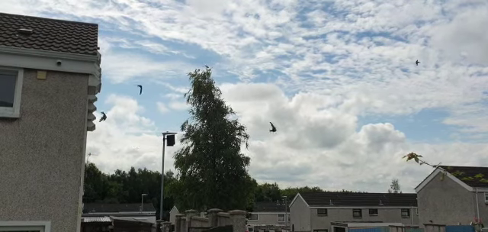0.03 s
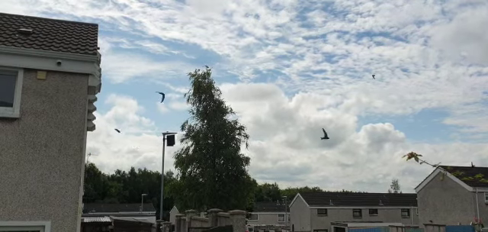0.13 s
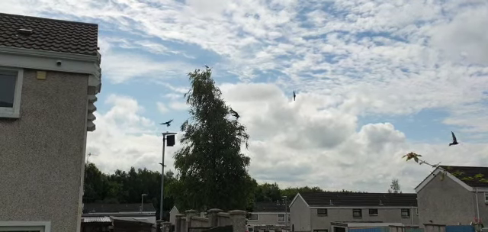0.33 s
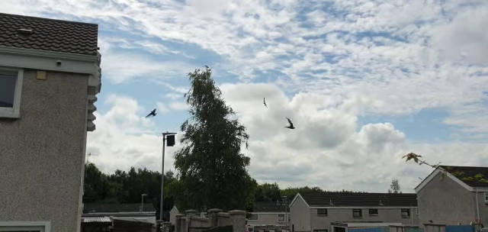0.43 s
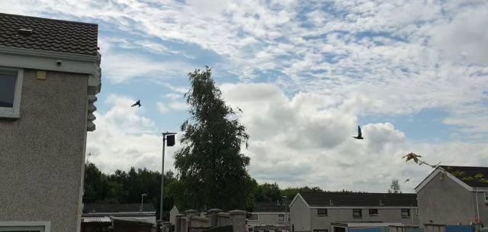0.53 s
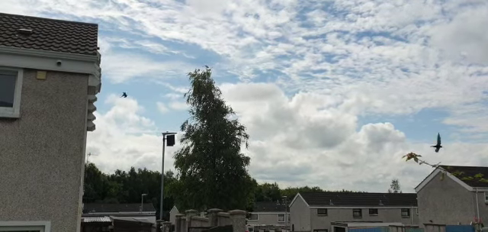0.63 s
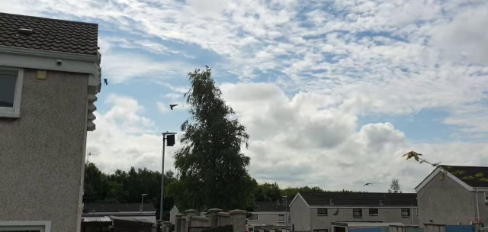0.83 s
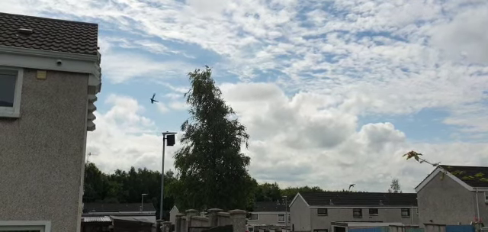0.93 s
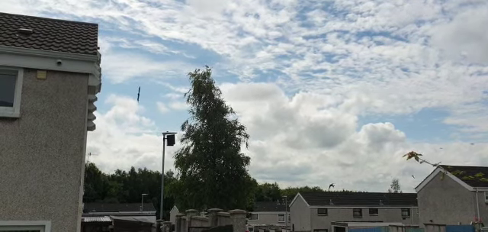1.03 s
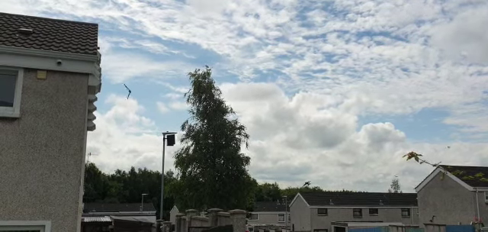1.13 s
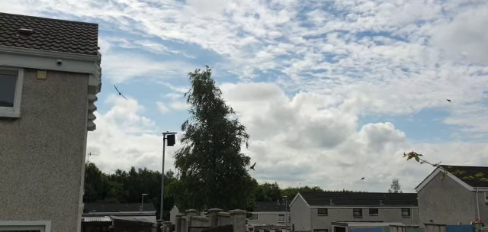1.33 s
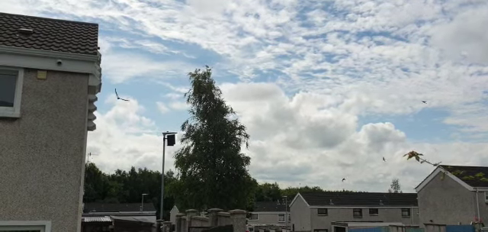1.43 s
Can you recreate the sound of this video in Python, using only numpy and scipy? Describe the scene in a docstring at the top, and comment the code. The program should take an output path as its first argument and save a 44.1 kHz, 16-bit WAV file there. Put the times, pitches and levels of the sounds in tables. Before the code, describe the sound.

Outdoor stereo pickup of fast-flying swifts: a piercing, raspy scream swells on the right, stutters into quick short notes and drops away, followed by thinner, higher, farther screams echoing off walls, with barely audible town rumble, hum and hiss.

```python
"""Screaming swifts between houses

Swifts scream on the right: each voice is a high whistle, modulated in level and pitch by a fast buzz,
and one scream ends in a falling trill of short notes. Distant voices are heard as well.
Walls add reflections whose phases slide, and a tail of random echoes that dies away, treble first.
Shaped noise makes a faint town rumble and hiss; a narrow-band wavering tone makes a hum on the left."""
import sys
import numpy as np
from scipy import signal
from scipy.fft import rfft, irfft
from scipy.io import wavfile
from scipy.ndimage import uniform_filter1d

SR = 44100
rng = np.random.default_rng(int(sys.argv[2]) if len(sys.argv) > 2 else 0)


def to_linear_factor(level_db):
    """Convert decibel levels (scalar or array-like) to linear amplitude factors."""
    exponent = np.asarray(level_db, float) / 20
    return 10 ** exponent


def bounce(signal):
    """Save signal as a 16-bit WAV file at the path given by the first command-line argument."""
    frames = np.transpose(np.atleast_2d(signal))
    limited = np.clip(frames, -1, 1)
    pcm = np.round(limited * 32767).astype(np.int16)
    wavfile.write(sys.argv[1], SR, pcm)


N = 66150  # samples

# Notes of the near trill: t/s, source level/dB, f/Hz
TRILL = [(.4765, -30, 5620), (.499, -32, 5630), (.5225, -28, 5660), (.5465, -32, 5630), (.5715, -35, 5500),
         (.5955, -35, 5350), (.6215, -45, 4850), (.648, -59, 4350)]
BUZZ_HZ = 235  # mean rate of the buzz in the voice
RASP_HZ = 504  # bandwidth of the rough noise modulation of the voice
SLIDE_HZ = 48.6  # how fast the sound paths slide in phase as a bird moves


def read(points, hz):
    """Linear interpolation of a spectral curve on a logarithmic frequency axis."""
    f, value = np.transpose(points)
    return np.interp(np.log(hz + 1), np.log(f + 1), value)


def wander(hz, channels=1):
    """Low-pass filtered complex Gaussian noise of unit power, up to about hz."""
    noise = rng.standard_normal((channels, N)) + 1j * rng.standard_normal((channels, N))
    low_pass = 1 / (1 + (np.fft.fftfreq(N, 1 / SR) / hz) ** 4)
    slow = np.fft.ifft(noise * low_pass)
    return slow / np.sqrt(np.mean(abs(slow) ** 2))


def town():
    """Spectrally shaped, partly coherent stereo noise, with a hum as a randomly modulated tone."""
    # Noise spectrum, relative: f/Hz, spectral density/dB
    spectrum = [(28, -41.5), (48, -0.5), (70, -8), (160, -19.5), (900, -26), (2000, -28.5), (3300, -36.5),
                (8000, -41.5), (12000, -37.5), (15500, -37)]
    # Level of left over right: f/Hz, level difference/dB
    side_balance = [(60, 19.5), (200, 8), (500, -2.5), (6500, -4.5), (8700, 12.5), (11000, -0.5)]
    # Coherence of the two sides: f/Hz, correlation/1
    coherence = [(60, 0.92), (290, 0.03), (1000, 0.033)]
    town_db = -71  # rms of the mean of both sides
    hum_hz, hum_width_hz, hum_db = 67.5, 23, -69
    frames, hz = N // 512 + 5, np.fft.rfftfreq(2048, 1 / SR)
    a, b, c, d, patches = rng.standard_normal((frames, 1025, 5)).T
    patches = uniform_filter1d(patches, size=20, axis=0)  # smooth over frequency
    patches = uniform_filter1d(patches, size=8, axis=1)  # smooth over time
    same = np.clip(read(coherence, hz), -1, 1)[:, None]
    side = to_linear_factor(read(side_balance, hz))[:, None]
    left = a + 1j * b
    right = same * left + np.sqrt(1 - same ** 2) * (c + 1j * d)
    z = np.array([side * left, right]) / np.sqrt(1 + side ** 2)
    z *= to_linear_factor(read(spectrum, hz)[:, None] + 1.7 * patches / patches.std())  # drift of 1.7 dB rms
    noise = signal.istft(z, nperseg=2048, noverlap=1536)[1][:, :N]
    carrier = np.exp(2j * np.pi * hum_hz * np.arange(N) / SR)
    hum = ((1 + 1.3 * wander(hum_width_hz)[0]) * carrier).real
    hum_sides = to_linear_factor(np.array([[0.1], [-18]]))  # left, right in dB
    return to_linear_factor(town_db) * noise / noise.mean(0).std() + to_linear_factor(hum_db) * hum * hum_sides


def whistle(hz, shape, octave):
    """Phase integration of a pitch: a tone and its second harmonic, each under its own envelope."""
    phase = 2 * np.pi * np.cumsum(hz) / SR
    return np.sqrt(2) * (shape * np.exp(1j * phase) + octave * np.exp(2j * phase))


def scream(rows, depth, lean, jitter, octave_db):
    """Joint amplitude and phase modulation of a whistle by an uneven buzz, with noisy sidebands."""
    clean_s = .016  # a clean start, then the voice breaks into the buzz
    break_db, break_s, break_hz = 17, .008, 800  # splash of rasp at the break, above the pitch
    buzz_jitter, flutter_depth, flutter_hz = .22, .33, 110
    rasp_db, octave_rasp = -13, .7  # rasp against the tone; depth of the rasp on the octave
    octave_even_s = .039  # the octave follows only the slow course of the level
    s, hz, db = np.transpose(rows)
    t = np.arange(N) / SR
    since = t - s[0] - clean_s * (s[0] > 0)
    # A voice that reaches either end of the scene is left unfaded there
    fade_in = np.clip((t - s[0]) / .003 + (s[0] == 0), 0, 1)
    fade_out = np.clip((s[-1] - t) / .004 + (s[-1] * SR >= N), 0, 1)
    on = np.clip(since / .003, 0, 1)
    buzz = 2 * np.pi * np.cumsum(BUZZ_HZ * (1 + buzz_jitter * wander(40)[0].real)) / SR
    level_shake = (1 + on * depth * np.cos(buzz)) / np.sqrt(1 + depth ** 2 / 2)
    shake = level_shake * np.exp(1j * lean * on * np.sin(buzz))
    flutter = (1 + on * flutter_depth * wander(flutter_hz)[0]) / np.sqrt(1 + flutter_depth ** 2)
    rasp = on * to_linear_factor(rasp_db) * wander(RASP_HZ)[0]
    splash = to_linear_factor(break_db) * np.exp(-abs(since) / break_s + 2j * np.pi * break_hz * t)
    rasp = rasp * (1 + splash)
    pitch = np.interp(t, s, hz) * (1 + jitter * wander(32.13)[0].real)
    level_db = np.interp(t, s, db)
    slow_db = uniform_filter1d(level_db, round(octave_even_s * SR))
    even_db = np.minimum(slow_db, level_db + 6)
    octave = np.clip(since / octave_even_s * 2, 0, 1) * to_linear_factor(octave_db + even_db)
    octave = octave * shake ** 3 * (1 + octave_rasp * wander(RASP_HZ)[0])
    return fade_in * fade_out * whistle(pitch, to_linear_factor(level_db) * (shake * flutter + rasp), octave)


def trill(rows, share=1):
    """Exponential pitch glides under raised-cosine edges: short notes, the fainter ones raspier."""
    note_s, edge_s, buzz_depth = .0098, .0024, .1
    scoop, scoop_s = .16, .001  # share of the pitch missing at the onset, time constant of its rise
    octave_db = -28  # against the tone, for a note at the reference level
    faded_rasp = .03  # rasp gained per dB of fading
    out, rasp = np.zeros(N, complex), wander(RASP_HZ)[0]
    reference_db = TRILL[0][1]
    t = np.arange(0, note_s, 1 / SR)
    edge = np.sin(np.clip(np.minimum(t, note_s - t) / edge_s, 0, 1) * np.pi / 2) ** 2
    buzzed = edge * (1 - buzz_depth * np.cos(2 * np.pi * BUZZ_HZ * t))
    glide = 1 - scoop * np.exp(-t / scoop_s)
    for s, db, hz in rows:
        at = round(s * SR)
        above_db = db - reference_db
        roughness = 1 - faded_rasp * above_db * rasp[at:at + len(t)]
        shape = to_linear_factor(reference_db + share * above_db) * buzzed * roughness
        out[at:at + len(t)] += whistle(hz * glide, shape, to_linear_factor(octave_db + above_db / 2) * shape)
    return out


def walls(z, db):
    """Multipath interference: direct sound plus early reflections of sliding phase, unlike per side."""
    # Extra path of each wall: delay/s
    bounces = [.0017, .0038, .0071, .0125, .021]
    direct_left = np.roll(z, 21) * (1 + wander(SLIDE_HZ)[0]) / 2  # 21 samples later than the right
    out = np.array([direct_left, z])
    for s in bounces:
        delayed = np.pad(z, (round(s * SR), 0))[:N]
        out = out + to_linear_factor(db) / np.sqrt(len(bounces)) * wander(SLIDE_HZ, channels=2) * delayed
    return out.real / np.sqrt(1 + to_linear_factor(db) ** 2)


def yard(x):
    """Exponential decay of sparse random echoes in two bands, smeared in phase by the birds' motion."""
    low_t60_s, treble_t60_s, treble_db = 1.28, 0.5, 5
    split_hz, build_up_s = 8600, .0013
    taps = np.zeros((2, SR))
    # One tap of random sign in every 20 samples
    at = np.arange(0, SR - 20, 20) + rng.integers(0, 20, (2, (SR - 1) // 20))
    np.put_along_axis(taps, at, rng.choice([-1., 1.], at.shape), 1)
    t, tail = np.arange(SR) / SR, 0
    for kind, t60, db in (("low", low_t60_s, 0), ("high", treble_t60_s, treble_db)):
        dying = taps * to_linear_factor(-60 * t / t60) * np.clip(t / build_up_s, 0, 1)
        dying = dying / np.linalg.norm(dying[0])
        band = signal.sosfilt(signal.butter(4, split_hz, kind, fs=SR, output="sos"), x)
        tail = tail + to_linear_factor(db) * signal.fftconvolve(band[None], dying, axes=1)[:, :N]
    smear = np.exp(2j * wander(SLIDE_HZ, channels=2).real)
    return (signal.hilbert(tail) * smear).real


def swifts():
    """Superposition of all voices and their reflections, filtered by the beak and by a left shade."""
    # Pitch and level tracks of the screams: t/s, f/Hz, source level/dB
    leaving = [(0, 6116, -67), (.19, 6040, -75)]
    gone = [(0, 4727, -50), (0.188, 5100, -88)]
    near = [(.196, 4586, -47.5), (.208, 4710, -42), (.216, 4900, -48), (.231, 5036, -36.5),
            (.255, 5344, -31), (.272, 5400, -28.5), (.305, 5488, -30.5), (.33, 5605, -31.5),
            (.35, 5565, -37), (.362, 5664, -29.5), (.378, 5665, -26.5), (.398, 5715, -29),
            (.42, 5612, -31.5), (.445, 5675, -26.5), (.47, 5660, -29)]
    behind = [(.41, 6196, -60), (.45, 5913, -41.5), (.58, 6334, -46), (.79, 6213, -51), (.84, 6080, -75),
              (.94, 6350, -76)]
    late = [(.945, 5223, -52), (.962, 5475, -59.5), (.98, 5638, -50), (.998, 5890, -55.5),
            (1.012, 5980, -44), (1.06, 6126, -47.5), (1.118, 6300, -45.5), (1.135, 6404, -44.5),
            (1.17, 6435, -39.5), (1.195, 6377, -50), (1.215, 6416, -42), (1.28, 6497, -49),
            (1.306, 6490, -44), (1.315, 6346, -44.5), (1.335, 6412, -45.5), (1.43, 6325, -45.5)]
    under = [(1.021, 5420, -48), (1.099, 5707, -59.5), (1.36, 5793, -51.5), (1.5, 5685, -50.5)]
    low = [(0.991, 4775, -53.5), (1.02, 4733, -67), (1.198, 4854, -64.5), (1.331, 4750, -76.5)]
    # Trill notes of distant birds: t/s, source level/dB, f/Hz
    far_notes = [(.036, -54, 5520), (.088, -63.5, 4430), (.875, -53, 5850)]
    # Level of left against right: f/Hz, level difference/dB
    left_shade = [(6500, -19), (8500, 5), (11000, -2)]
    # Colour of the beak: f/Hz, gain/dB
    beak = [(3300, 1), (4300, -4), (9500, -1.5)]
    # Track, buzz depth, upward lean of sidebands, pitch jitter, octave/dB, reflections/dB, tail/dB
    birds = [(near, .42, .3, .003, -27, -10, -14),
             (late, .5, -.4, .004, -50, -7, -7),
             (leaving, .7, 0, .015, -50, 3, -3),
             (gone, .9, 0, .06, -35, 3, -3)]
    birds += [(far, .9, -.3, .03, -50, 3, -3) for far in (behind, under, low)]
    turn_share = .45  # as the bird turns away its echo fades by this share only
    near_trill, far_trill = trill(TRILL), trill(far_notes)
    out = walls(near_trill, -16) + walls(far_trill, -3)
    wet = to_linear_factor(-14) * (trill(TRILL, turn_share).real + far_trill.real)  # what feeds the tail
    for *voice, wall_db, tail_db in birds:
        z = scream(*voice)
        out = out + walls(z, wall_db)
        wet = wet + to_linear_factor(tail_db) * z.real
    hz = np.fft.rfftfreq(N, 1 / SR)
    left = to_linear_factor(read(left_shade, hz))
    sides = 2 * np.array([left, np.ones_like(left)]) / np.sqrt(1 + left ** 2)  # constant total power
    return irfft(rfft(out + yard(wet)) * to_linear_factor(read(beak, hz)) * sides, N)


def scene():
    """Linear superposition of the birds and the town."""
    return swifts() + town()


def roll_off(x):
    """The treble ends steeply here."""
    return signal.sosfilt(signal.butter(12, 15920, fs=SR, output="sos"), x)


def record(dry):
    """Band limitation by a linear-phase low-pass filter at 15.75 kHz."""
    low_pass = signal.firwin(511, 15750, window=("kaiser", 9), fs=SR)
    mix = signal.oaconvolve(dry, low_pass[None], "same")
    return roll_off(mix)


dry = scene()
out = record(dry)
bounce(out)
```